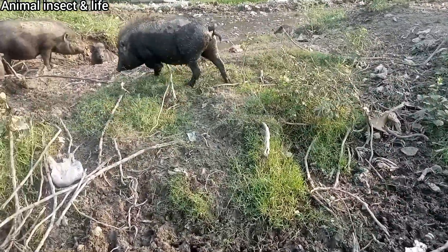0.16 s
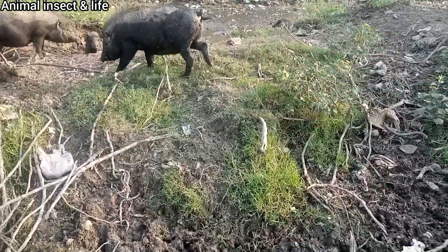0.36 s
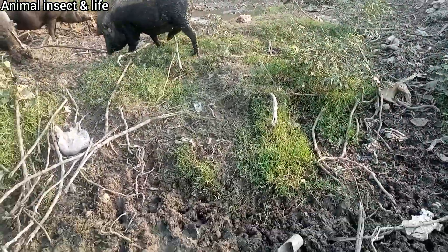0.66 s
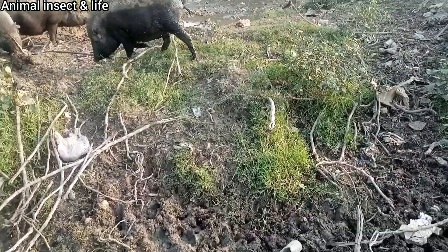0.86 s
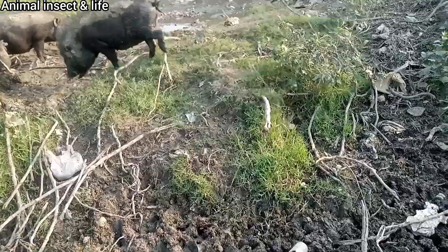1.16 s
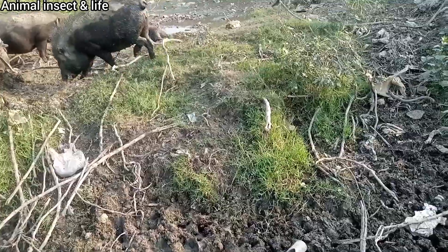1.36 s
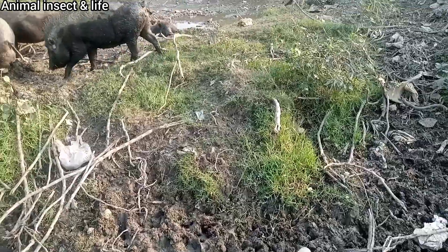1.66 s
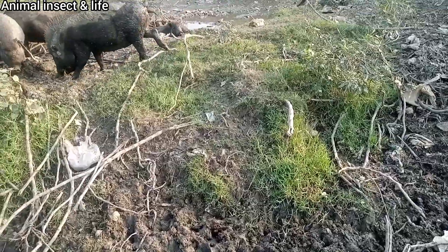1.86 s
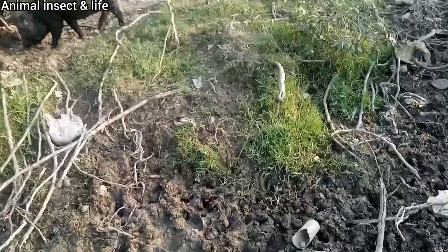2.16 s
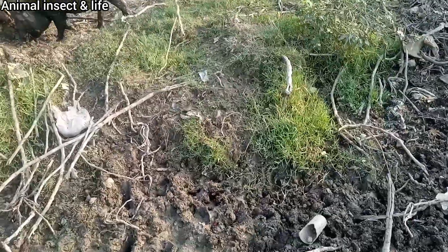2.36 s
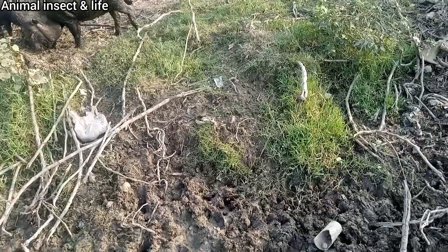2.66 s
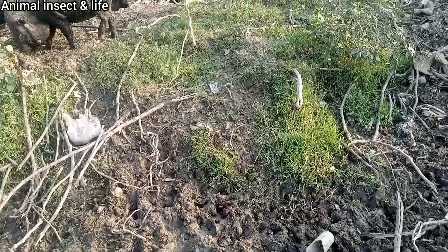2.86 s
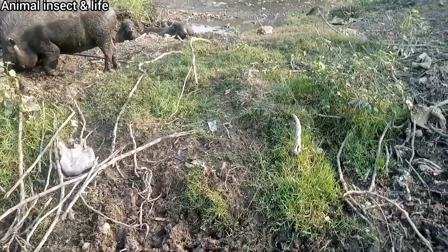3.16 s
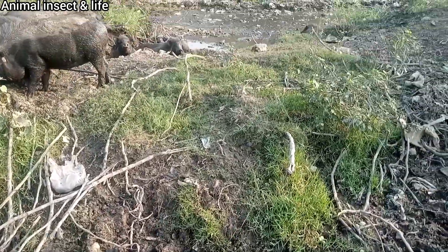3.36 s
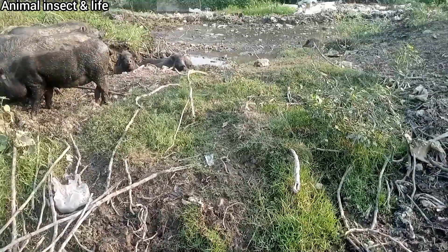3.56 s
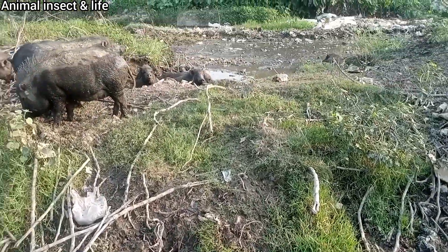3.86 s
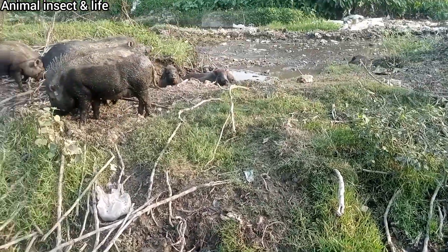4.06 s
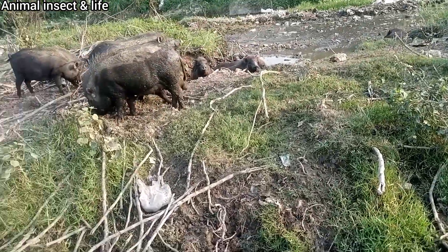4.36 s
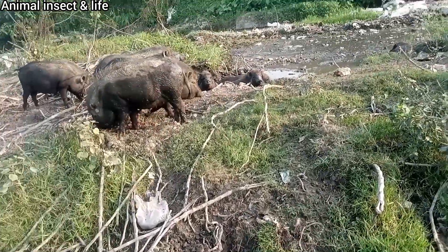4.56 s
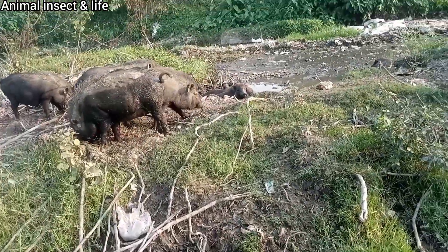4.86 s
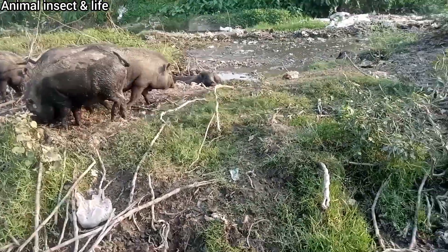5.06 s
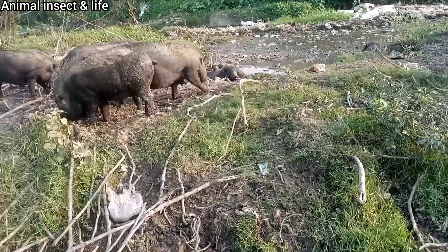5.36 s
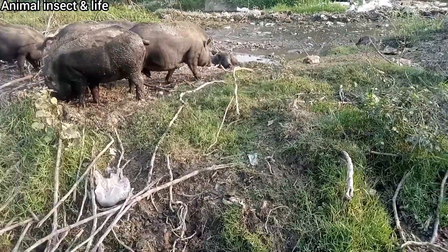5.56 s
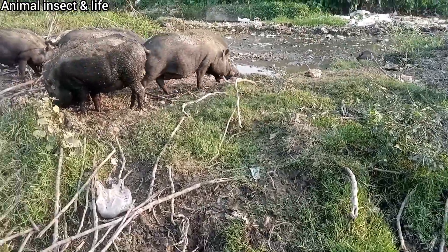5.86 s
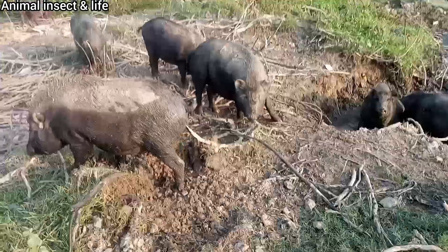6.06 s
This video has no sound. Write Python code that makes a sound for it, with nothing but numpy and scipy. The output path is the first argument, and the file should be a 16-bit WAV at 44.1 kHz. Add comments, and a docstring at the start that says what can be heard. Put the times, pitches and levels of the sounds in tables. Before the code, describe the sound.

Birds in nearby bushes dominate all six seconds with high gliding whistles, quick trills, chips, warbles and harsh scolding rasps, lightly echoed, while a flock chatters continuously behind. A sharp stalk snap and a few dry bird clucks open the scene. The calls are busiest from about 0.8 to 2.6 seconds, ease around 3 to 4, then pick up again. Underneath, a shallow stream babbles softly and a distant diesel engine thuds low, growing slightly louder from 3 seconds.

Pigs rooting on the bank snap dry stalks at scattered moments, most clearly around 3.9, 4.3 and 5.1 seconds. Tiny wet mud smacks come at 2.3, 2.6 and 4.6. A piglet whines very faintly at 3.9, and quiet, low, rough grunts follow at 4.7 and from 5.6 to 5.9. Dry litter rustles briefly at 3.6 and again near 6 seconds, along with a soft, deep bump on the microphone.

```python
"""Birds and pigs by a muddy stream

Myna-like birds in the bushes, most near the microphone, sing gliding whistles, trills, arched chips and
warbles, and rasp with a fluttering syrinx; banks and leaves echo them, and the flock chatters behind.
On the bank, pigs root in the mud, crack dry stalks and grunt in slow pulses through the snout.
Shallow water babbles underneath, and far off a slow diesel engine thuds once per firing."""
import sys
import numpy as np
from scipy import signal
from scipy.fft import rfft, irfft, next_fast_len
from scipy.io import wavfile
from scipy.ndimage import uniform_filter1d, map_coordinates

SR = 44100
rng = np.random.default_rng(int(sys.argv[2]) if len(sys.argv) > 2 else 0)


def persist_wave(psi):
    """Save psi, clipped to +-1, as 16-bit WAV."""
    counts = np.round(np.clip(psi, -1, 1) * 32767).astype(np.int16)
    wavfile.write(sys.argv[1], SR, np.atleast_2d(counts).T)


N = 273420

# Levels are relative within each table; filters and the mix set what reaches the microphone.
# the steady bed: t/s, engine level/dB, stream level/dB
BED_LEVELS = [(0, -56.5, -51.5), (1.2, -53, -53), (2.3, -52.5, -50), (3.3, -48, -50), (4.4, -46.5, -48.5),
              (5, -47, -47), (5.9, -47, -47.5), (6.2, -54, -50.5)]
# engine speed: t/s, firing rate/Hz
FIRING_RATE = [(0, 28.1), (3, 25.3), (4.3, 26.8), (6.2, 24.8)]
# the exhaust from far off: f/Hz, gain/dB
EXHAUST_EQ = [(25, -26), (53, -8.5), (80, -19), (106, 3.5), (133, 0.5), (160, 1), (187, -4.5), (235, -29.5),
              (330, -15), (600, -34.5), (1500, -61), (5000, -115)]
# murmur of shallow water: f/Hz, gain/dB
STREAM_EQ = [(20, -42), (45, 1.5), (100, 12), (200, 7), (330, -0.5), (480, -3), (720, 4), (1000, -3.5),
             (1300, -1.5), (1800, -3.5), (4000, -6), (9000, -52), (15500, -59)]
# the flock from deep in the bushes: f/Hz, gain/dB
FLOCK_EQ = [(1000, -43.5), (1900, -5), (2700, -3), (3600, -2.5), (4600, -3), (5500, -4.5), (6800, 1.5),
            (8200, -9), (10000, -21.5), (13000, -35.5), (16000, -42)]
# loudness of the far flock: t/s, level/dB
FLOCK_LEVELS = [(0.0, -34.5), (1.67, -33), (2.3, -32), (2.73, -36), (3.47, -36), (4.65, -32.5), (4.82, -37),
                (6.2, -33)]
# a bird's throat favours the octave when it lands near 6.8 kHz: fundamental f/Hz, octave level/dB
OCTAVE_LEVELS = [(2200, -29), (2650, -13), (2950, -25.5), (3230, -9), (3400, -4.5), (3700, -13.5),
                 (4300, -30.5), (5200, -45)]
# single gliding whistles: t/s, length/s, start f/Hz, end f/Hz, end level/dB
WHISTLES = [(0, 0.021, 2270, 2360, -30.5), (0.661, 0.058, 3440, 2710, -41.5),
            (0.707, 0.043, 3280, 2920, -36), (.718, 0.029, 6550, 6490, -34.5),
            (0.762, .078, 2086, 2340, -32.5), (0.917, .042, 3810, 4840, -27.5),
            (1.017, 0.082, 3393, 3372, -23.5), (1.127, 0.061, 3760, 2480, -36.5),
            (1.19, 0.074, 2960, 4900, -19.5), (1.866, 0.04, 5100, 4820, -32),
            (1.974, 0.062, 5800, 4470, -25.5), (2.028, 0.098, 2445, 2980, -25.5),
            (2.059, .073, 3680, 3760, -26), (2.165, 0.039, 3020, 3200, -24),
            (2.202, 0.053, 3390, 3510, -30), (2.287, 0.04, 3590, 3980, -22),
            (2.328, 0.023, 4200, 4820, -19.5), (2.361, 0.035, 3790, 2820, -24.5),
            (2.507, .045, 4560, 4336, -31), (2.879, 0.043, 3090, 2120, -35.5),
            (2.92, 0.048, 2480, 2980, -34), (3.016, 0.088, 2260, 2680, -38.5),
            (3.778, 0.081, 3390, 2805, -35), (3.816, 0.041, 7100, 4460, -34.5),
            (3.822, 0.082, 4970, 3560, -33.5), (4.087, .024, 2697, 3030, -23.5),
            (4.375, .14, 4280, 4450, -33.5), (4.642, .019, 4600, 3020, -30),
            (4.672, 0.051, 4350, 3710, -27), (4.722, 0.03, 3900, 4520, -26.5),
            (4.907, 0.1, 2043, 2300, -43), (5.065, 0.057, 3400, 4200, -30.5),
            (5.161, 0.037, 3750, 4370, -24), (5.199, 0.069, 3930, 4400, -30.5),
            (5.962, 0.023, 3570, 2550, -33.5), (5.982, 0.11, 3450, 3160, -35),
            (6.081, 0.062, 5900, 5620, -32.5), (6.095, 0.084, 5450, 3330, -29.5),
            (6.16, 0.044, 3300, 2184, -33.5)]
# what carries across the bank from the birds: f/Hz, gain/dB
BANK_EQ = [(1000, 5), (2000, -2.5), (7300, -3), (8500, 0), (10500, -16), (13000, 4), (16000, -34)]
# stalks snapping: t/s, level/dB
SNAPS = [(0.0258, -25), (0.5711, -35), (0.812, -37.5), (1.3516, -35), (2.82, -34), (3.715, -36),
         (3.9367, -31), (4.3368, -30.5), (5.1198, -27.5), (5.1861, -34), (5.357, -38), (5.9417, -34),
         (6.0526, -36)]
# pigs brushing through dry litter: t/s, length/s, level/dB
RUSTLES = [(3.568, 0.084, -44.5), (5.931, 0.49, -47)]
# brightness of dry stalks: f/Hz, gain/dB
STALK_EQ = [(600, -28), (2000, 7), (4500, 11.5), (7000, 23), (9500, 5.5), (13000, -3), (15500, -4.5)]
# short dry clucks: t/s, level/dB
CLUCKS = [(0.149, -32), (0.166, -38), (0.196, -30.5), (0.236, -32), (0.26, -33.5), (0.277, -34.5)]
# resonance of a cluck: f/Hz, gain/dB
CLUCK_EQ = [(900, -39), (1600, -15.5), (2400, -7), (2900, -6), (3600, -14), (9000, -25.5), (14000, -51)]
# scolding calls: t/s, length/s, f/Hz, level/dB, harshness/0-1
RASPS = [(0.245, 0.24, 3730, -28, .12), (.292, 0.14, 3000, -36.5, 0), (.911, 0.06, 4230, -33, 0.8),
         (0.963, 0.066, 4200, -28.5, 0.9), (1.034, 0.069, 2847, -31.5, .2), (1.265, 0.067, 4100, -29.5, 1),
         (1.465, 0.14, 3600, -28.5, 0.61), (1.602, 0.13, 3530, -27, 0.3), (1.877, 0.12, 3750, -27.5, 0.91),
         (2.038, 0.11, 3820, -29, 0.81), (2.343, 0.12, 4050, -33, 0.94), (2.509, 0.13, 3526, -35.5, 0.58),
         (3.044, 0.137, 3570, -31.5, 0.22), (3.301, 0.15, 3476, -40.5, 0.84),
         (3.617, 0.177, 3590, -31.5, .4), (4.196, 0.16, 3800, -27, 0.53), (4.481, .22, 3642, -27.5, 0.36),
         (5.126, 0.093, 3845, -29.5, 0.47), (5.443, .12, 3680, -32, 0.74), (5.727, .11, 3670, -30.5, 0.71),
         (5.798, 0.12, 3967, -27, 0.32), (6.073, 0.097, 4075, -31, 0.6)]
# throat of a rasping bird: f/Hz, gain/dB
THROAT_EQ = [(1500, -12), (2300, -6.5), (2900, 2), (4400, 2.5), (5100, -4.5), (5800, 7.5), (6700, 3),
             (7600, -1.5), (8600, 0), (15000, -19)]
# warbles: t/s, length/s, dip rate/Hz, low f/Hz, high f/Hz, level/dB
WARBLES = [(0.388, 0.12, 22.4, 2235, 2850, -36), (1.195, 0.15, 35, 2230, 2900, -43),
           (1.457, 0.34, 56, 2090, 2910, -38), (4.153, 0.11, 25, 2740, 3200, -32),
           (5.223, 0.14, 25, 2280, 2750, -43), (5.634, 0.067, 16, 2700, 3090, -38)]
# runs of one slur: t/s, notes, spacing/s, start f/Hz, end f/Hz, level/dB
TRILLS = [(.448, 3, 0.063, 5900, 2760, -30.5), (1.892, 3, 0.034, 4870, 2970, -26),
          (1.99, 6, 0.01, 3280, 2720, -26.5), (2.544, 3, 0.027, 3300, 2874, -29),
          (2.695, 5, 0.021, 7000, 3240, -36.5), (2.968, 6, .032, 4380, 2777, -31.5),
          (3.388, 8, 0.017, 5760, 3820, -33.5), (3.931, 4, 0.027, 2120, 1680, -49),
          (4.014, 3, 0.024, 2250, 2470, -35), (4.052, 2, 0.069, 3750, 2570, -31.5),
          (4.53, 3, .045, 8650, 7750, -51), (4.768, 2, 0.03, 4390, 3940, -28.5),
          (4.805, 6, 0.017, 3100, 2420, -49), (5.035, 4, 0.026, 2890, 2700, -38),
          (5.354, 3, 0.054, 3260, 5290, -28.5), (5.386, 2, 0.06, 4610, 2450, -37),
          (5.504, 4, 0.017, 2960, 2380, -33), (5.781, 4, 0.018, 2090, 1830, -41.5)]
# runs of arched chips: t/s, notes, spacing/s, nominal f/Hz, level/dB
CHIPS = [(0.851, 3, 0.027, 3023, -23.5), (0.969, 1, 0.0255, 6930, -24.5), (1, 1, 0.02, 7650, -30),
         (1.28, 2, 0.035, 3367, -23.5), (1.428, 5, 0.013, 3310, -27.5), (1.496, 8, 0.013, 3780, -23.5),
         (1.714, 2, 0.036, 3120, -27.5), (2.397, 1, 0.034, 3340, -21.5), (2.627, 1, .05, 3060, -37.5),
         (2.764, 4, 0.018, 2825, -35), (3.227, 5, 0.025, 3510, -39.5), (3.443, 3, 0.033, 2450, -38),
         (4.479, 1, 0.032, 2910, -29.5), (4.577, 1, 0.067, 2960, -28.5)]
# wet smacks in the mud: t/s, f/Hz, level/dB
SMACKS = [(2.304, 1224, -33.5), (2.647, 1194, -37), (4.566, 1200, -36.5)]
# a piglet's faint whine: t/s, length/s, start f/Hz, end f/Hz, level/dB
WHINES = [(3.9, 0.13, 450, 570, -50.5)]
# low grunts: t/s, length/s, pulse rate/Hz, level/dB
GRUNTS = [(4.661, 0.24, 53, -51.5), (5.638, 0.13, 57, -47.5), (5.743, 0.21, 52, -47)]
# resonance of a pig's snout: f/Hz, gain/dB
SNOUT_EQ = [(50, -46), (130, -7.5), (260, -1), (400, -6.5), (650, -30), (1200, -15), (3000, -51)]
# a soft bump on the microphone: t/s, length/s, f/Hz, level/dB
BUMPS = [(5.951, .06, 40, -44.5)]


def amp(db):
    """Decibels to gain."""
    return 10 ** (np.asarray(db) / 20)


def unit(x):
    """Scale to rms 1."""
    return x / np.sqrt(np.mean(x ** 2) + 1e-20)


def curves(rows):
    """One value per sample for each column after the time."""
    times, *columns = np.transpose(rows)
    return [np.interp(np.arange(N) / SR, times, column) for column in columns]


def wobble(rate, size=N):
    """A smooth random curve with rate knots a second."""
    return map_coordinates(rng.standard_normal(1024), [np.arange(size) * rate / SR], mode="wrap")


def colour(x, points):
    """Minimum-phase filter through points of f/Hz, gain/dB."""
    m = 2 * next_fast_len(len(x) // 2 + 4096)
    hz, db = np.transpose(points)
    gain = amp(np.interp(np.log(np.fft.rfftfreq(m, 1 / SR) + 1), np.log(hz), db))
    cepstrum = irfft(np.log(gain))
    cepstrum[1:m // 2] *= 2
    cepstrum[m // 2 + 1:] = 0
    return irfft(rfft(x, m) * np.exp(rfft(cepstrum)), m)[:len(x)]


def add(track, s, sound):
    """Mix a sound into the track at time s."""
    part = track[max(0, round(s * SR)):][:len(sound)]
    part += sound[:len(part)]


def progress(length):
    """A ramp from 0 to 1 that lasts length seconds."""
    return np.linspace(0, 1, max(int(length * SR), 16))


def swell(u, edge):
    """Envelope of rms 1; edge is the share of the call taken by each fade."""
    return unit(np.sin(np.pi / 2 * np.clip(np.minimum(u, 1 - u) / edge, 0, 1)) ** 2)


def phase_of(hz):
    """Running phase of a gliding frequency, from a random start."""
    return 2 * np.pi * (np.cumsum(hz) / SR + rng.random())


def arc(length, start, middle, end):
    """A parabola through three pitches."""
    return np.polyval(np.polyfit([0, .5, 1], [start, middle, end], 2), progress(length))


def engine(scatter_db=0.4, puff=0.011):
    """A diesel far off: one exhaust thud per firing, each with a puff of turbulence."""
    cycles = np.cumsum(curves(FIRING_RATE)[0]) / SR
    firings = np.diff(np.floor(cycles), prepend=0) * amp(scatter_db * wobble(25))
    gas = puff * rng.standard_normal(N) * np.exp(-2 * (cycles % 1))
    return unit(colour(firings + gas, EXHAUST_EQ))


def stream(patchy_db=3.0):
    """Shallow water babbles: its murmur swells and sinks in small patches of time and pitch."""
    spectrum = signal.stft(rng.standard_normal(N), nperseg=1024)[2]
    patches = uniform_filter1d(rng.standard_normal(spectrum.shape), size=5, axis=0)
    patches = unit(uniform_filter1d(patches, size=9, axis=1))
    babble = signal.istft(spectrum * amp(patchy_db * patches))[1][:N]
    return unit(colour(babble, STREAM_EQ))


def note(pitch, db, waver=0.0095, glide_waver_s=0.00079, flicker_db=2.5, third_db=-12, edge=0.18):
    """A bird's whistled note with two overtones; the faster the slur, the rougher its pitch."""
    u = np.linspace(0, 1, len(pitch))
    glide_rate = abs(np.log(pitch[-1] / pitch[0])) * SR / len(u)
    roughness = waver + glide_waver_s * glide_rate
    phase = phase_of(pitch * (1 + roughness * wobble(598, len(u))))
    third_fade = np.clip((SR / 11 - pitch) / 500, 0, 1)  # high notes lose the third harmonic
    third = amp(third_db) * np.sin(3 * phase) * third_fade
    overtone_db = np.interp(pitch, *np.transpose(OCTAVE_LEVELS))
    overtone_db += 0.46 * (db + 26.5)  # softer notes are purer
    tone = np.sin(phase) + amp(overtone_db) * (np.sin(2 * phase) + third)
    return np.sqrt(2) * tone * swell(u, edge) * amp(db + flicker_db * wobble(177, len(u)))


def bush_echo(x, t60=0.3, early_db=4, reflections=5, bank_gain=18):
    """A few reflections off the banks and a short tail from the leaves, drawn anew every 1/8 s."""
    out, t = np.zeros(N), np.arange(SR // 3) / SR
    step = SR // 8
    padded = np.pad(x, (0, 2 * step))
    decay = amp(-60 * t / t60) * (1 + amp(early_db) * np.exp(-t / 0.0025)) * (t > .002)
    for start in range(0, N, step):
        tail = rng.standard_normal(len(t)) * decay
        delays = rng.integers(SR // 300, SR // 40, reflections)
        tail[delays] += bank_gain * rng.choice([-1, 1], reflections)
        piece = padded[start:start + 2 * step] * signal.windows.cosine(2 * step)
        add(out, start / SR, signal.fftconvolve(piece, tail / np.linalg.norm(tail)))
    return out


def far_flock(count=700, echo_db=2, hiss=0.77):
    """Many birds chirp at random from deeper in the bushes; the farthest merge into a hiss."""
    chirps = np.zeros(N)
    for k, (when, size, pitch, slope, bend, loud) in enumerate(rng.uniform(-1, 1, (count, 6))):
        contour_hz = 3600 * np.exp(.4 * pitch + np.array([0.1749 * slope, 0.0837 * bend, -.17 * slope]))
        chirp = note(arc(.03 * np.exp(.6 * size), *contour_hz), db=-26.5, waver=0.019)
        add(chirps, (k + 2 * when) / count * N / SR, amp(1.1 * loud) * chirp)
    chatter = unit(chirps + amp(echo_db) * bush_echo(chirps))
    return unit(colour(chatter + hiss * rng.standard_normal(N), FLOCK_EQ))


def slur(length, start_hz, end_hz, db, sag=0.14, climb_db_per_octave=11.5, fall_db_per_octave=-0.5):
    """A gliding note: a climb swells; a fall drops fast, levels off and fades a little."""
    octaves = np.log2(end_hz / start_hz)
    middle_hz = np.sqrt(start_hz * end_hz) * 2 ** (sag * min(octaves, 0))
    swell_db = abs(octaves) * (climb_db_per_octave if octaves > 0 else fall_db_per_octave)
    return note(arc(length, start_hz, middle_hz, end_hz), db) * amp(swell_db * (progress(length) - 1))


def whistles():
    """Single slurs from the near bushes."""
    out = np.zeros(N)
    for s, length, start_hz, end_hz, db in WHISTLES:
        add(out, s, slur(length, start_hz, end_hz, db))
    return out


def stalks(decay_s=0.0013, snap_db=-9, crackle_db=-58, count=70):
    """Dry stalks break under hooves on the bank: a few sharp snaps, many tiny ones, gritty rustles."""
    snaps, litter = np.zeros(N), np.zeros(N)
    t = np.arange(SR // 10) / SR
    decay = np.exp(-t / decay_s) + 0.26 * np.exp(-t / 0.021)
    crackles = np.column_stack([rng.random(count) * N / SR, crackle_db + 4 * rng.standard_normal(count)])
    for s, db in np.vstack([SNAPS, crackles]):
        add(snaps, s, amp(db + snap_db) * rng.standard_normal(len(t)) * decay)
    for s, length, db in RUSTLES:
        u = progress(length)
        grit = rng.standard_normal(len(u)) * amp(4.3 * wobble(500, len(u)))
        add(litter, s, amp(db) * unit(colour(grit, STALK_EQ)) * swell(u, edge=0.098))
    return colour(snaps, STALK_EQ) + litter


def clucks(length_s=0.0097):
    """A near bird clucks in short, dry bursts of noise."""
    out, u = np.zeros(N), progress(length_s)
    for s, db in CLUCKS:
        add(out, s, amp(db) * unit(colour(rng.standard_normal(len(u)), CLUCK_EQ)) * swell(u, edge=0.3))
    return out


def rasp(length, hz, harsh, flutter_hz=167, rise=0.0342, upper_ratio=1.76, crescendo_db=3):
    """The syrinx flutters, throwing pitch and loudness about and exciting a second, higher band."""
    u = progress(length)
    swing_hz = 192 + 535 * harsh  # harsher calls are wider, wilder and brighter
    chaos = 0.17 + 0.61 * harsh
    upper_db = -17 + 8 * harsh
    flap = phase_of(flutter_hz * (1 + 0.14 * chaos * wobble(120.7, len(u))))
    swing = 1.11 * np.cos(flap) + chaos * wobble(1300, len(u))
    pitch = hz * (1 + rise * (u - 0.5)) + swing_hz * swing
    upper_hz = upper_ratio * hz + 700 * wobble(1600, len(u))
    voice = np.sin(phase_of(pitch)) + amp(upper_db) * np.sin(phase_of(upper_hz))
    pulses = (1 + 0.083 * np.sin(flap)) * amp(3.3 * wobble(707, len(u)))
    return unit(voice * pulses * amp(crescendo_db * u)) * swell(u, edge=0.15)


def rasps():
    """The near birds scold, each rasp shaped by the throat."""
    out = np.zeros(N)
    for s, length, hz, db, harsh in RASPS:
        add(out, s, amp(db) * unit(colour(rasp(length, hz, harsh), THROAT_EQ)))
    return out


def warbles():
    """A bird's unbroken tone swings down from its high pitch in round dips."""
    out = np.zeros(N)
    for s, length, rate, low_hz, high_hz, db in WARBLES:
        dip = abs(np.sin(np.pi * rate * length * progress(length)))
        add(out, s, note(high_hz + (low_hz - high_hz) * dip, db, waver=0.013))
    return out


def repeats(s, notes, spacing, db, duty=0.66, longest_s=0.036, detune=0.0157, scatter_db=2.94):
    """Time, length, pitch factor and level of each note of a run; pitch and level scatter."""
    length = min(duty * spacing, longest_s)
    return [(s + k * spacing, length, 1 + detune * sharp, db - scatter_db * soft)
            for k, (sharp, soft) in enumerate(rng.standard_normal((round(notes), 2)))]


def trills():
    """A bird in the bushes repeats one short slur quickly."""
    out = np.zeros(N)
    for s, notes, spacing, start_hz, end_hz, db in TRILLS:
        for when, length, tune, note_db in repeats(s, notes, spacing, db):
            add(out, when, slur(length, tune * start_hz, tune * end_hz, note_db))
    return out


def chips(foot=0.9086, top=0.98):
    """Short arched chips, most close by and one faint run farther off, each rising and dropping back."""
    out = np.zeros(N)
    for s, notes, spacing, hz, db in CHIPS:
        for when, length, tune, note_db in repeats(s, notes, spacing, db):
            add(out, when, note(tune * hz * arc(length, foot, top, foot), note_db, edge=0.14))
    return out


def mud_smacks(length_s=0.021):
    """Wet cavities in the mud ring briefly as the pigs root."""
    out, u = np.zeros(N), progress(length_s)
    for s, hz, db in SMACKS:
        cavity = np.sin(phase_of(hz * (1 + 0.065 * wobble(930, len(u)))))
        add(out, s, amp(db) * cavity * np.exp(-2.5 * u) * swell(u, edge=0.042))
    return out


def piglet_whine():
    """A faint, unsteady rising tone of four equal harmonics."""
    out = np.zeros(N)
    for s, length, start_hz, end_hz, db in WHINES:
        u = progress(length)
        pitch = (start_hz + (end_hz - start_hz) * u) * (1 + 0.027 * wobble(84, len(u)))
        voice = np.sin(np.outer(np.arange(1, 5), phase_of(pitch))).sum(0)
        add(out, s, amp(db) * unit(voice) * swell(u, edge=0.33))
    return out


def grunts():
    """A pig's vocal folds send slow, rough pulses through the snout."""
    out = np.zeros(N)
    for s, length, rate, db in GRUNTS:
        u = progress(length)
        cycle = phase_of(rate * (1 + .15 * wobble(60, len(u)))) / (2 * np.pi) % 1
        folds = np.exp(-6 * cycle) * (1 + 7 * rng.standard_normal(len(u)))
        add(out, s, amp(db) * unit(colour(folds, SNOUT_EQ)) * swell(u, edge=0.14))
    return out


def microphone_bump():
    """A soft knock on the microphone: a few cycles of deep bass."""
    out = np.zeros(N)
    for s, length, hz, db in BUMPS:
        u = progress(length)
        add(out, s, amp(db) * unit(np.sin(2 * np.pi * hz * length * u)) * swell(u, edge=0.59))
    return out


def scene(whistle_db=-2, trill_db=-1, chip_db=-0.5, warble_db=-3, scold_db=-0.5,
          echo_db=-7, flock_db=-3, water_db=4.5):
    """One microphone by the stream: birds in the bushes, pigs on the bank, flock and engine far off."""
    engine_db, stream_db = curves(BED_LEVELS)
    chatter_db, = curves(FLOCK_LEVELS)
    song = amp(whistle_db) * whistles() + amp(trill_db) * trills()
    song += amp(chip_db) * chips() + amp(warble_db) * warbles()
    birds = colour(song + amp(scold_db) * (rasps() + clucks()), BANK_EQ)
    distant = amp(chatter_db + flock_db) * far_flock() + amp(engine_db) * engine()
    water = amp(stream_db + water_db) * stream()
    echo = amp(echo_db) * bush_echo(birds)
    pigs = grunts() + piglet_whine() + mud_smacks() + stalks()
    return (birds + echo + distant + water + pigs + microphone_bump())[None]


def record(dry, top_hz=15800):
    """The microphone passes nothing above its band limit."""
    m = next_fast_len(N + SR // 2)
    return irfft(rfft(dry, m) * (np.fft.rfftfreq(m, 1 / SR) < top_hz), m)[:, :N]


dry = scene()
out = record(dry)
persist_wave(out)
```